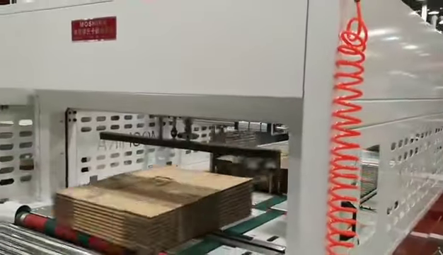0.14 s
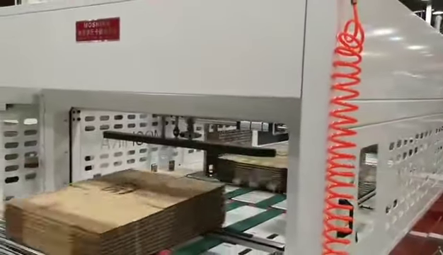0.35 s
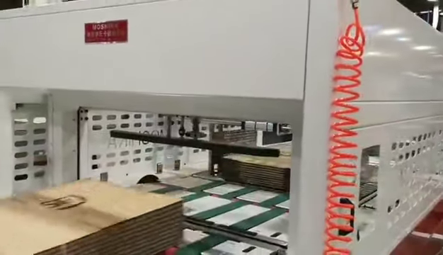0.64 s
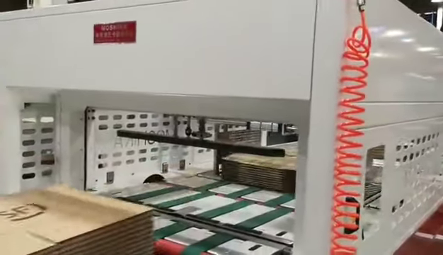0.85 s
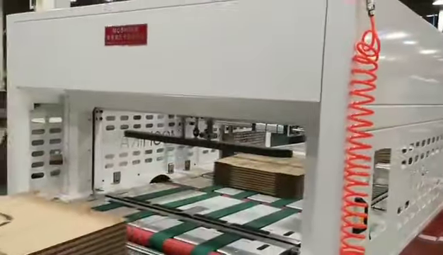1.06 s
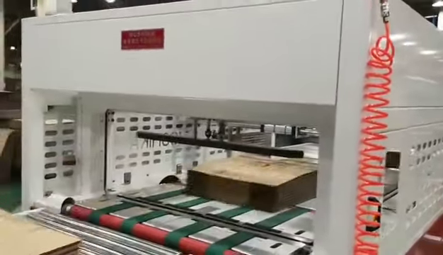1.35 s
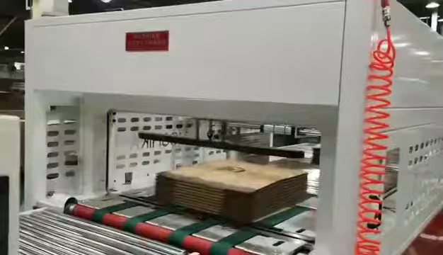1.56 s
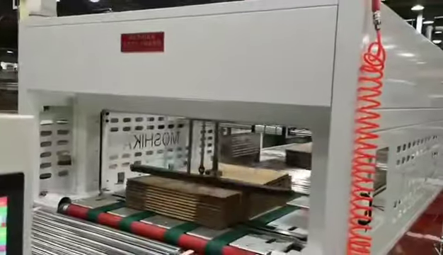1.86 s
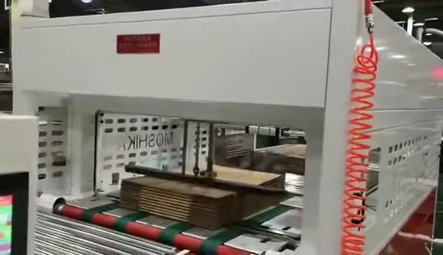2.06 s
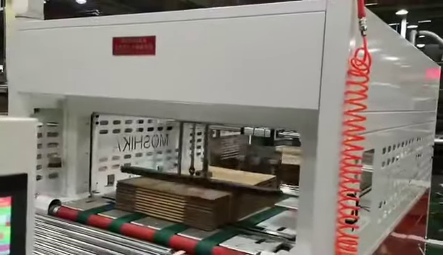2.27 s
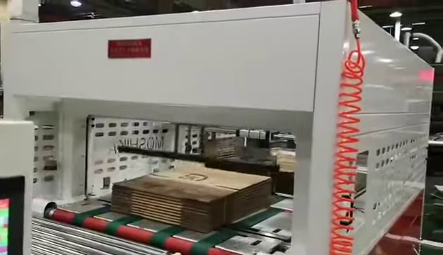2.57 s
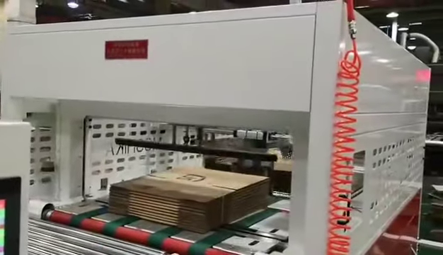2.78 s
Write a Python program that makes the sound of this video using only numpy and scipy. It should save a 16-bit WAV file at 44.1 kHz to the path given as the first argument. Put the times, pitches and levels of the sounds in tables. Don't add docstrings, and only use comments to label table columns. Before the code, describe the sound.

A roller conveyor and strapping machine roar steadily over low factory rumble and motor hum; a few light rattles and air puffs come first, then hard metal clacks cluster around two seconds, heard close on a phone.

```python
import sys
import numpy as np
from scipy import signal
from scipy.fft import rfft, irfft
from scipy.io import wavfile
from scipy.ndimage import uniform_filter1d

SR = 44100
rng = np.random.default_rng(int(sys.argv[2]) if len(sys.argv) > 2 else 0)


def pcm_store(signal):
    levels = np.round(np.clip(np.atleast_2d(signal), -1, 1) * 32767)
    wavfile.write(sys.argv[1], SR, levels.astype(np.int16).T)


def boost_factor(decibels):
    exponent = np.asarray(decibels, float) / 20
    return 10 ** exponent


N = 129654

# pitch_hz, level_db [dB per Hz]
RUMBLE_SPECTRUM = [(8.8, -47), (15, -4), (114, -2), (136, -1), (238, -9), (280, -11), (318, -12.5),
                   (606, -25), (700, -26), (910, -60), (1540, -120)]
# pitch_hz, level_db [dB per Hz]
ROLLER_SPECTRUM = [(290, -32), (500, -14.5), (740, -9.5), (886, -3), (1180, -4), (1550, -4.5), (2530, 0.5),
                   (2950, -4.5), (3340, -10.5), (4250, -14.5), (5800, -12.5), (6300, -17), (8190, -52),
                   (13900, -120)]
# time_s, level_db
CONVEYOR_LOAD = [(0, 1), (.5, 0.5), (1.0, -1), (1.35, 0.5), (1.5, -3.5), (1.62, -8), (1.75, 0),
                 (1.95, -0.5), (2.15, 0.5), (2.35, 0), (2.6, -0.5), (2.94, -1.5)]
# time_s, level_db
HALL_SURGE = [(0.0, -16), (0.71, -17.5), (0.81, -19.5), (0.9, -14.5), (1.05, -19.5), (1.07, -16),
              (1.73, -23), (1.78, -15), (1.96, -19), (2.0, -22), (2.27, -19), (2.59, -19), (2.67, -15.5),
              (2.83, -21.5), (2.9, -17), (2.94, -18)]
# pitch_hz, level_db [rms], width_hz
MOTOR_TONES = [
    (113.02, -24, 4),
    (154.7, -31, 11),
    (237.5, -33.5, 7),
    (731, -48.5, 3.9),
    (845, -53, 5.4),
    (2646, -41, 10),
    (5200, -63.5, 2.9),
    (6030, -50.5, 67),
]
# start_s, level_db, centre_hz, length_s
VALVE_PUFFS = [
    (1.06, -36, 5300, .05),
    (1.115, -28, 5500, .03),
    (1.41, -29, 5000, .02),
    (1.5545, -23, 5600, .016),
]
# start_s, level_db, centre_hz, rattle_s, spread_octaves
METAL_CLACKS = [(.09, -22.5, 3320, 0.073, 2.1), (.735, -26.5, 3560, 0.014, 1.6),
                (1.429, -27.5, 4200, 0.0029, 0.8), (1.644, -23, 2210, .035, 0.45),
                (1.648, -29, 5420, 0.038, 0.34), (1.695, -23, 2440, 0.034, 0.3),
                (1.964, -17.5, 2880, 0.018, .35), (1.983, -19.5, 5210, .025, .3),
                (1.978, -14.5, 2380, .04, .55), (2.041, -23.5, 3140, 0.024, 0.77),
                (2.09, -26, 2580, 0.044, 0.44), (2.254, -29, 2640, 0.012, 0.45),
                (2.38, -22, 2900, 0.01, 0.88), (2.4, -18, 2700, .028, .8), (2.418, -22, 4500, .003, .8),
                (2.485, -21, 2200, .03, .7), (2.542, -29.5, 2170, 0.045, 0.61),
                (2.579, -25, 2000, 0.017, 1.5), (2.71, -31, 3470, 0.012, 0.86),
                (2.846, -26, 2330, 0.055, 0.32)]
# start_s, level_db, centre_hz
HARD_BLOWS = [(1.554, -19, 3306), (1.5544, -20, 5880), (1.5637, -21, 3185), (1.978, -12, 2710),
              (1.987, -14.5, 2197), (1.9875, -17.5, 5275), (2.4066, -16.5, 2493), (2.4221, -25, 3920),
              (2.488, -22, 2730), (2.5519, -23, 2180), (2.492, -21.5, 1450), (1.556, -22.5, 2006),
              (1.557, -22.5, 4606)]
# pitch_hz, correlation [-1 to 1]
PORT_LIKENESS = [(60, .994), (120, .975), (200, .94), (300, .82), (490, .12), (2400, -.1), (4000, .2),
                 (6700, .35)]
# pitch_hz, difference_db
PORT_LEAN = [(60, 0), (300, -.2), (600, -1.2), (1650, -.3), (2100, -8.5), (2900, -8.5), (3800, -2.5),
             (6700, -1.5)]
# start_s, length_s, spared [1 = strongest band survives]
TREBLE_GAPS = [
    (1.519, .0065, 1),
    (1.5405, .0055, 0),
]
# start_s, length_s, left_db, right_db
OPEN_TREBLE = [
    (1.408, .03, -6, -2),
    (1.49, .02, -3, -20),
    (1.527, .036, 0, 0),
    (2.417, .009, -3, -30),
]


def evened(x):
    return x / np.sqrt(np.mean(x ** 2) + 1e-20)


def read(points, hz):
    f, value = np.transpose(points)
    return np.interp(np.log(hz + 1), np.log(f + 1), value)


def control(points):
    return np.interp(np.arange(N) / SR, *np.transpose(points))


def during(start_s, length_s):
    t = np.arange(N) / SR
    return 1. * (t > start_s) * (t < start_s + length_s)


def add(mix, start_s, sound):
    part = mix[round(start_s * SR):][:len(sound)]
    part += sound[:len(part)]


def lowpass(x, edge_hz):
    taps = signal.firwin(2047, edge_hz, window=("kaiser", 10), fs=SR)
    return signal.oaconvolve(x, taps[None], "same")


def resonate(x, hz, width_hz):
    turn = np.exp(2j * np.pi * hz * np.arange(len(x)) / SR)
    r = np.exp(-np.pi * width_hz / SR)
    return 2 * (turn * signal.lfilter([1 - r], [1, -r], x / turn)).real


def shape(hold_s, rise_s, fade_s):
    t = np.arange(0, hold_s + 0.32, 1 / SR)
    return np.minimum(t / rise_s, 1) * np.exp(-np.maximum(t - hold_s, 0) / fade_s)


def wash(colour, level_db, patchy_db, flicker_db, size):
    hop = size // 4
    frames, hz = N // hop + 5, np.fft.rfftfreq(size, 1 / SR)
    a, b, c, d, patches = rng.standard_normal((frames, len(hz), 5)).T
    patches = uniform_filter1d(uniform_filter1d(patches, size=9, axis=0), size=9, axis=1)
    flicker = evened(uniform_filter1d(rng.standard_normal(frames), size=3))
    same = np.clip(read(PORT_LIKENESS, hz), -1, 1)[:, None]
    left = a + 1j * b
    right = same * left + np.sqrt(1 - same ** 2) * (c + 1j * d)
    level = read(colour, hz)[:, None] + patchy_db * evened(patches) + flicker_db * flicker
    z = np.array([left, right]) * boost_factor(level)
    noise = signal.istft(z, nperseg=size, noverlap=size - hop)[1][:, :N]
    return boost_factor(level_db) * evened(noise)


def surge_db():
    return control(HALL_SURGE) + 18


def hall_rumble():
    return wash(RUMBLE_SPECTRUM, surge_db() - 17.5, patchy_db=0.46, flicker_db=0.62, size=2048)


def roller_roar():
    return wash(ROLLER_SPECTRUM, control(CONVEYOR_LOAD) - 22.5, patchy_db=1.3, flicker_db=.6, size=512)


def motors():
    out = np.zeros(N)
    for hz, db, width_hz in MOTOR_TONES:
        tone = resonate(resonate(rng.standard_normal(N), hz, width_hz), hz, width_hz)
        out += boost_factor(db) * evened(tone)
    return np.array([out, out]) * boost_factor(.5 * surge_db())


def hall_echo(x):
    t60_s, top_hz, taps_per_s = .45, 7000, 2000
    t = np.arange(SR // 2) / SR
    signs = rng.choice([-1., 1.], (2, len(t)))
    taps = signs * (rng.random((2, len(t))) < taps_per_s / SR) * boost_factor(-60 * t / t60_s)
    taps = signal.lfilter(*signal.butter(1, top_hz, fs=SR), taps)
    return signal.fftconvolve(x[None], taps / np.linalg.norm(taps[0]), axes=1)[:, :N]


def valve_puff(db, centre_hz, length_s):
    width_hz, body_db = 1500, 0.5
    env = shape(length_s, rise_s=.001, fade_s=.0031)
    air = rng.standard_normal(len(env))
    jet = evened(resonate(resonate(air, centre_hz, width_hz), centre_hz, width_hz))
    hiss = evened(resonate(air, 3600, 2500))
    return boost_factor(db) * env * (jet + boost_factor(body_db) * hiss)


def metal_clack(db, centre_hz, rattle_s, octaves):
    knocks_per_s, ring_s, count = 1800, .02, 160
    env = shape(rattle_s, rise_s=.006, fade_s=.014)
    happens = rng.random(len(env)) < knocks_per_s / SR
    force = rng.random(len(env)) - .5
    knocks = env * happens * np.sign(force) * (.5 + abs(force))
    t = np.arange(1400) / SR
    place, length, side = rng.random((3, count, 1))
    modes_hz = 700 + 6300 * (np.arange(count)[:, None] + place) / count
    gain = np.exp(-.5 * (np.log2(modes_hz / centre_hz) / octaves) ** 2) * np.sign(side - .5)
    modes = np.sin(2 * np.pi * modes_hz * t) * boost_factor(-60 * t / (ring_s * (.5 + length)))
    sound = signal.fftconvolve(knocks, (gain * modes).sum(0))
    return boost_factor(db) * sound / np.std(sound[:round((rattle_s + .02) * SR)])


def hard_blow(db, centre_hz):
    ring_s, octaves, rise_s = .028, .45, .0013
    t = np.arange(1500) / SR
    place, phase = rng.random((2, 40, 1))
    modes_hz = centre_hz * 2 ** (octaves * (2 * place - 1))
    modes = np.sin(2 * np.pi * (modes_hz * t + phase)) * boost_factor(-60 * t / ring_s)
    sound = modes.sum(0) * np.minimum(t / rise_s, 1)
    return boost_factor(db) * sound / np.std(sound[:200])


def scene():
    hits = np.zeros(N)
    for maker, events in [(valve_puff, VALVE_PUFFS), (metal_clack, METAL_CLACKS), (hard_blow, HARD_BLOWS)]:
        for start_s, *settings in events:
            add(hits, start_s, maker(*settings))
    left_lag_s, body_left, treble_left = .0006, .6, .6
    body = lowpass(hits[None], 4700)[0]
    left = treble_left * (hits - body) + body_left * np.roll(body, round(left_lag_s * SR))
    near = np.array([left, hits]) + boost_factor(-10) * hall_echo(hits)
    return near + hall_rumble() + roller_roar() + motors()


def starve(x):
    starve_from_hz, step_db, step_db_per_khz, wobble_db, memory = 1500, -8, 2.8, 4, .4
    wide_bands_hz, side_starve_db, side_bass_hz = 4480, 2.5, 260
    dropout_luck, dropout_db = .66, -14
    n, k = np.arange(2048), np.arange(1024)
    line_hz = k * SR / 2048
    window = np.sin(np.pi * (n + .5) / 2048)
    basis = window * np.cos(np.pi / 1024 * np.outer(k + .5, n + 512.5)) / np.sqrt(512)
    at = np.arange(N // 1024 + 2)[:, None] * 1024 + n
    fold = np.array([[1, 1], [1, -1.007]]) / np.sqrt(2)
    padded = np.pad(fold @ x, ((0, 0), (1024, 3072)))
    lines = padded[:, at] @ basis.T
    first = np.where(line_hz > wide_bands_hz, (k - 16) // 24 * 24 + 16, k // 12 * 12)
    band, hz = first // 12, (first + 8) * SR / 2048
    power = uniform_filter1d(lines ** 2, size=64, axis=2)
    recent = signal.lfilter([1 - memory], [1, -memory], power, axis=1)
    held = np.maximum(power, recent)[:, :, first + 8]
    luck = .4 * rng.standard_normal((len(at), 86)) + .92 * rng.standard_normal((2, len(at), 86))
    luck = luck[:, :, band]
    rise_db = step_db_per_khz * (hz - starve_from_hz) / 1000
    step = np.sqrt(abs(held) + 1e-18) * boost_factor(step_db + rise_db + wobble_db * luck)
    step[1] *= boost_factor(side_starve_db * (hz > wide_bands_hz))
    side_lost = uniform_filter1d(luck[1, :, :1], size=3, axis=0) > .1
    lines[1] *= 1 - (line_hz < side_bass_hz) * side_lost
    mid, side = uniform_filter1d(rng.standard_normal((2, len(at), 86)), size=2, axis=1)[:, :, band]
    lost = np.array([mid, np.maximum(mid, side)]) > dropout_luck
    lines *= boost_factor(dropout_db * (hz > wide_bands_hz) * lost)
    coarse = np.sign(lines) * np.floor(abs(lines) / step + 0.36) * step
    rounded = np.where(hz > starve_from_hz, coarse, lines) @ basis
    out = np.zeros_like(padded)
    out[:, at[:, :1024]] += rounded[:, :, :1024]
    out[:, at[:, 1024:]] += rounded[:, :, 1024:]
    return fold @ out[:, 1024:1024 + N]


def treble_of(x):
    split = signal.butter(4, 800, fs=SR, output="sos")
    return x - signal.sosfiltfilt(split, x)


def gain_control(x):
    duck_from_db, duck_share, recover_db_per_s = -18, 0.21, 39
    power = uniform_filter1d((treble_of(x) ** 2).mean(0), size=900)
    power_db = 10 * np.log10(abs(power) + 1e-12)
    fall = np.arange(N) / SR * recover_db_per_s
    held_db = np.maximum.accumulate(power_db + fall) - fall
    over_db = np.maximum(held_db - duck_from_db, 0)
    return x / boost_factor(duck_share * uniform_filter1d(over_db, size=400))


def treble_limit(x):
    edge_hz = 6200
    extra = x - lowpass(x, edge_hz)
    quick = uniform_filter1d(sum(during(s, d) for s, d, *_ in OPEN_TREBLE), size=300)
    x = lowpass(quick * x + (1 - quick) * starve(x), edge_hz)
    opened = sum(np.outer(boost_factor([left_db, right_db]), during(s, d)) for s, d, left_db, right_db in OPEN_TREBLE)
    return x + uniform_filter1d(opened, size=200) * extra


def gaps(x):
    treble = treble_of(x)
    keep = uniform_filter1d(np.prod([1 - during(s, d) for s, d, _ in TREBLE_GAPS], axis=0), size=60)
    spare = uniform_filter1d(sum(on * during(s, d) for s, d, on in TREBLE_GAPS), size=60)
    strong = signal.sosfiltfilt(signal.butter(4, (2000, 3200), "band", fs=SR, output="sos"), x)
    bass = 1 - .85 * uniform_filter1d(during(1.551, .008), size=120)
    return bass * (x - treble) + keep * treble + spare * strong


def low_pass(x):
    return signal.sosfilt(signal.butter(12, 7360, fs=SR, output="sos"), x)


def record(dry):
    hz = np.fft.rfftfreq(N, 1 / SR)
    lean = boost_factor(np.outer([.5, -.5], read(PORT_LEAN, hz)))
    x = gain_control(irfft(rfft(dry) * lean, N))
    x = lowpass(.95 * np.tanh(x / .95), 6950)
    return low_pass(gaps(treble_limit(x)))


dry = scene()
out = record(dry)
pcm_store(out)
```